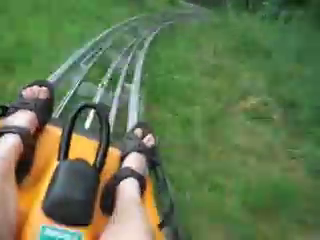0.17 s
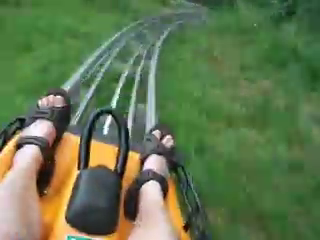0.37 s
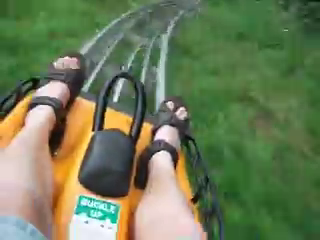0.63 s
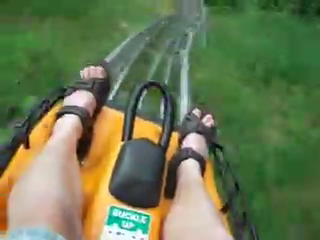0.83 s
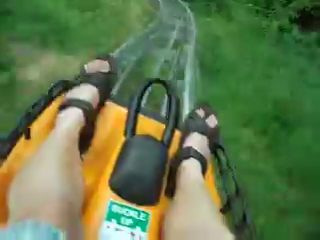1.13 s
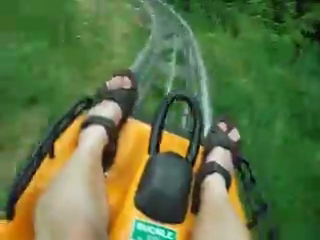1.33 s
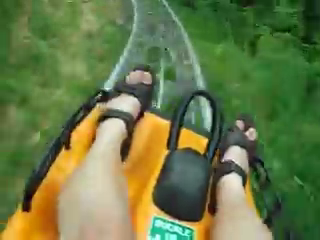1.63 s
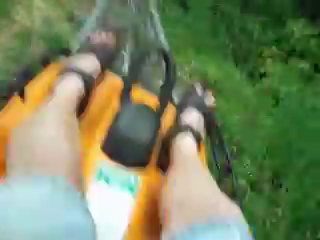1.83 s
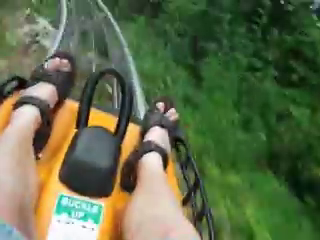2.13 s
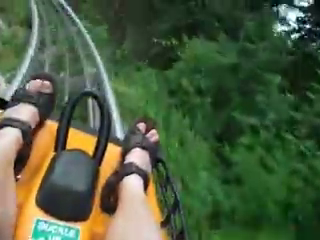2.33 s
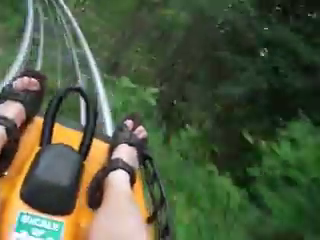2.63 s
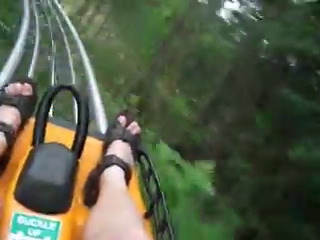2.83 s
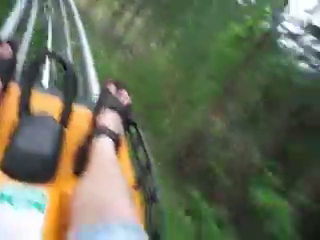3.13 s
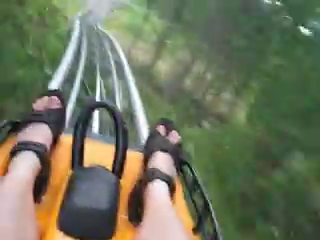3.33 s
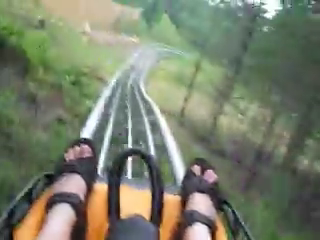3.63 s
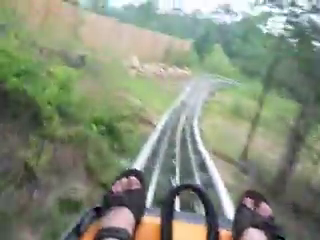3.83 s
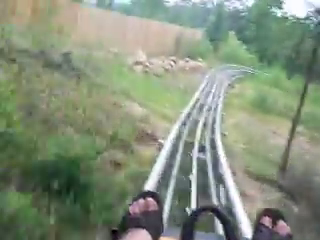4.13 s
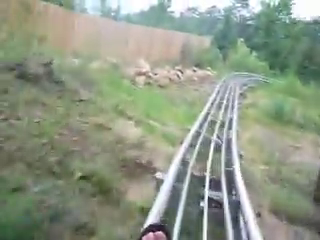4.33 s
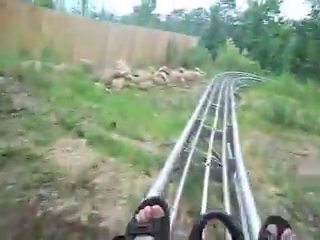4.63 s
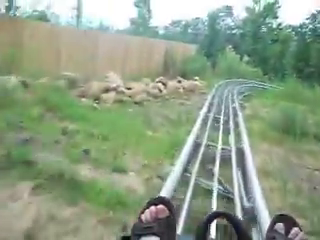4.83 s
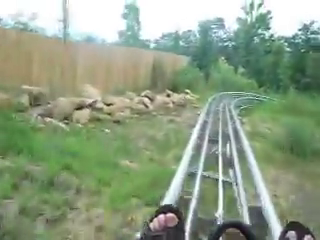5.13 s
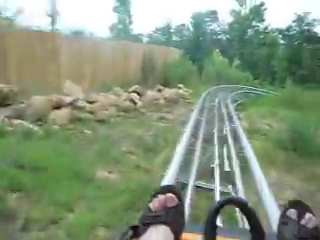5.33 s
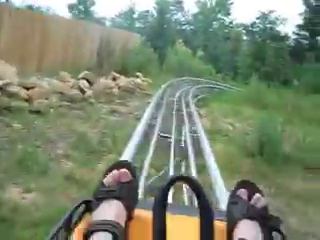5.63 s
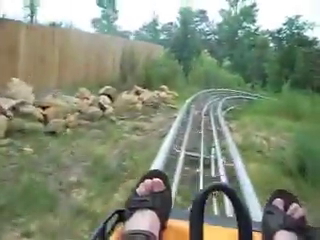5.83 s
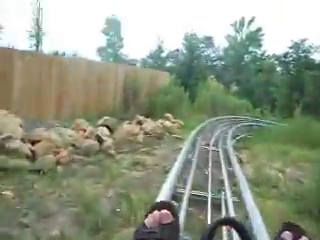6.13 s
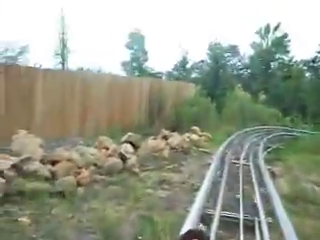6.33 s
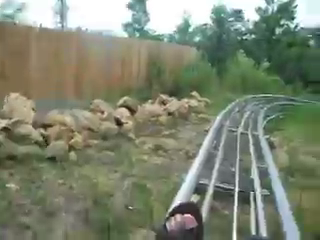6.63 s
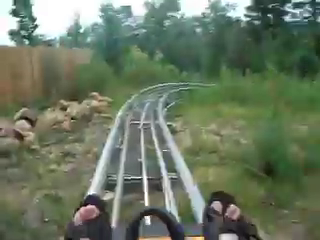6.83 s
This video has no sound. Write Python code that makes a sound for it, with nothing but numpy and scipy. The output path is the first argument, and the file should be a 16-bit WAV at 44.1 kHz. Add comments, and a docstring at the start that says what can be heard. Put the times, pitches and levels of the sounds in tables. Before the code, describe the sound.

Close rider's-seat sound of a coaster sled: hollow droning roar, wind buffeting, hard clacks and buckle ticks, then slower, heavier bumps as it eases off.

```python
"""Coaster sled on a steel track

A plastic sled runs down a tubular steel track, heard from the rider's seat through a small camera.
An out-of-round wheel slows and throbs in the hollow shell as orders of its turning rate near the shell's pitch.
Noise and tiny impacts through resonant modes make the wheels roar, hiss, rattle, clatter and grind.
The chassis thumps on bumps, a buckle ticks, flanges howl, narrow rings sound, and the brake rubs late.
Wind is low noise that grows with the shaking of the ride, with gusts on top."""
import sys
import numpy as np
from scipy import signal
from scipy.fft import rfft, irfft, next_fast_len
from scipy.io import wavfile
from scipy.ndimage import uniform_filter1d

SR = 44100
rng = np.random.default_rng(int(sys.argv[2]) if len(sys.argv) > 2 else 0)


def put_to_file(sound):
    """Save the sound as 16-bit audio at rate SR, in the file named by the first command-line argument."""
    columns = np.atleast_2d(sound).T  # one column per channel
    safe = np.clip(columns, -1, 1)
    whole_steps = np.round(safe * 32767)
    wavfile.write(sys.argv[1], SR, whole_steps.astype(np.int16))


N = 307813
TIME = np.arange(N) / SR  # s


def from_db(db):
    """Level law: decibels to amplitude gain."""
    return 10 ** (np.asarray(db) / 20)


def rms_one(x):
    """Power normalisation: scale to rms 1."""
    return x / np.sqrt(np.mean(x ** 2) + 1e-20)


def even_level(x, window, floor):
    """Automatic levelling: divide by the moving rms over a window of samples."""
    return x / np.sqrt(np.abs(uniform_filter1d(x ** 2, size=window)) + floor)


def in_time(rows):
    """Linear interpolation: each column of a curve at every sample."""
    s, *columns = np.transpose(rows)
    return [np.interp(TIME, s, c) for c in columns]


def drift(rate):
    """Low-passed noise: smooth chance of rms 1 that changes about rate times a second."""
    step = 40  # samples between the slow values
    r = np.exp(-2 * np.pi * step * rate / SR)
    noise = rng.standard_normal(N // step + 2002)
    # the first 2000 values let the filter settle
    slow = signal.lfilter([1], [1, -2 * r, r * r], noise)[2000:]
    return np.interp(np.arange(N) / step, np.arange(len(slow)), rms_one(slow))


def coloured(x, spectrum):
    """Spectral shaping: a drawn spectrum that falls 30 dB per octave outside its ends; rms 1."""
    hz, db = np.transpose(spectrum)
    octave = np.log2(np.maximum(np.fft.rfftfreq(2 * N, 1 / SR), 1))
    outside = np.abs(octave - np.clip(octave, np.log2(hz[0]), np.log2(hz[-1])))
    shape_db = np.interp(octave, np.log2(hz), db) - 30 * outside
    size = next_fast_len(N)
    gain = np.interp(np.linspace(0, N, size // 2 + 1), np.arange(N + 1), from_db(shape_db))
    return rms_one(irfft(rfft(x, size) * gain, size)[:N])


def resonate(x, hz, width_hz):
    """Damped resonance: two poles, with gain 1 on top."""
    r = np.exp(-np.pi * width_hz / SR)
    zeros = np.array([1, 0, -1]) * (1 - r * r) / 2
    poles = [1, -2 * r * np.cos(2 * np.pi * hz / SR), r * r]
    return signal.lfilter(zeros, poles, x + 1e-18)


def body(x, modes):
    """Modal superposition: parallel modes with alternating signs."""
    return sum((-1) ** k * from_db(db) * resonate(x, hz, width)
               for k, (hz, width, db) in enumerate(modes))


def shaken(force, modes, wander_db):
    """Forced vibration: a moving contact point shifts the power of a noisy force from mode to mode."""
    click = signal.unit_impulse(SR // 10)
    power = np.array([np.sum(body(click, [mode]) ** 2) for mode in modes])
    favour = np.array([from_db(wander_db * drift(17)) for mode in modes])
    rings = [(-1) ** k * favour[k] * body(force, [mode]) for k, mode in enumerate(modes)]
    return sum(rings) / np.sqrt(power @ favour ** 2)


def blows(times, db):
    """Impulsive excitation: one click for each blow."""
    clicks = np.zeros(N)
    clicks[np.clip(np.round(times * SR).astype(int), 0, N - 1)] = from_db(db)
    return clicks


def struck(times, peak_db, modes):
    """Impulse response: a body under single blows, each ringing up to its peak."""
    return body(blows(times, peak_db), modes) / np.abs(body(signal.unit_impulse(SR // 10), modes)).max()


def contacts(per_s, spread_db):
    """Random impact train: tiny impacts of uneven size and either sign; rms 1."""
    sizes = from_db(spread_db * np.minimum(rng.exponential(1, N), 4)) * rng.choice([-1, 1], N)
    return rms_one(sizes * (rng.random(N) < per_s / SR))


def swell(start, length, rise, fall):
    """Pressure envelope: linear build-up, a hold until length has passed, exponential decay (all in s)."""
    age = np.maximum(TIME - start, 0)
    return np.minimum(age / rise, 1) * np.exp(-np.minimum(np.maximum(age - length, 0) / fall, 20))


def surges(rows, rise, fall):
    """Superposition: summed swells given as (start [s], length [s], level [dB])."""
    return sum(from_db(db) * swell(s, length, rise, fall) for s, length, db in rows)


def softened(x, cut_hz):
    """Compliant contact: a low-pass takes off the sharp edge."""
    return signal.sosfilt(signal.butter(2, min(cut_hz, SR / 3), fs=SR, output="sos"), x)


def without_lows(x, cut_hz):
    """High-pass filtering: only the quick part of a motion remains."""
    return signal.sosfilt(signal.butter(2, cut_hz, "high", fs=SR, output="sos"), x)


def gliding(start, length, hz, hz_per_s, width_hz):
    """Noise-driven resonance: band noise on a carrier that may glide over the length; rms near 1."""
    noise = rng.standard_normal(N) + 1j * rng.standard_normal(N)
    band = softened(noise, cut_hz=width_hz / 2)
    pitch = hz + hz_per_s * np.clip(TIME - start, 0, length)
    tone = np.real(band * np.exp(2j * np.pi * np.cumsum(pitch) / SR))
    return even_level(tone, window=SR // 12, floor=1e-12)


# the out-of-round wheel slows all the way: (time [s], rate [turns/s])
WHEEL = [(0, 27.185), (1.65, 20.882), (3.1, 19.5), (4.25, 14.48), (6.98, 10.6)]


def wheel_turns(start_turn):
    """Rotation: the wheel's rate integrates to its angle in turns."""
    rate, = in_time(WHEEL)
    return np.cumsum(rate) / SR + start_turn, rate


# how hard the ride shakes the sled; drives boom, rumble and wind: (time [s], level [dB])
RIDE = [(0, -4.5), (.21, -5.5), (.25, -4), (.35, -1), (.48, -1.5), (.7, 1), (2.9, 0), (4.3, -1.5),
        (5.4, -3), (5.8, -12), (6.98, -14.5)]
# the wheel goes light and its throb eases: (start [s], length [s])
LIFTS = [(-.04, 0.24), (0.382, 0.21), (0.9, 0.2), (1.58, .24), (2.324, 0.092), (3.022, 0.21), (3.817, 0.44),
         (4.818, 0.44)]
LIFT_LOSS_DB = 5
# hollow of the shell
BOOM_HZ, BOOM_WIDTH_HZ = 106, 28.5
BOOM_DB = -16  # at 0 dB of ride
# wheel rates [turns/s] where the throb sets in and is full, and its full share of the boom's power
THROB_FROM_PER_S, THROB_FULL_PER_S, THROB_SHARE = 13, 15, 0.9


def boom(turns, rate):
    """Order excitation: a high spot pushes once a turn; the hollow favours orders near its own pitch."""
    throb = 0
    for order in range(3, 11):
        detune = (order * rate - BOOM_HZ) / (BOOM_WIDTH_HZ / 2)
        waver = from_db(drift(2))
        throb = throb + waver * np.cos(2 * np.pi * order * turns) / (1 + detune ** 2)
    throb = even_level(throb, window=SR // 4, floor=1e-9)
    # uneven rails shake the same hollow at random
    uneven = resonate(rng.standard_normal(N), BOOM_HZ, 2 * BOOM_WIDTH_HZ)
    uneven = rms_one(resonate(uneven, BOOM_HZ, 2 * BOOM_WIDTH_HZ))
    uneven = even_level(uneven, window=SR // 6, floor=1e-9)
    share = np.clip(np.interp(rate, [THROB_FROM_PER_S, THROB_FULL_PER_S], [0, THROB_SHARE]), 0, 1)
    lifted = sum(swell(s, length, rise=0.03, fall=0.024) for s, length in LIFTS)
    level_db = BOOM_DB + in_time(RIDE)[0] - LIFT_LOSS_DB * lifted
    return from_db(level_db) * (np.sqrt(share) * throb + np.sqrt(1 - share) * uneven)


# wheel rates [turns/s]: nothing shakes loose below the first; the second is the cruising rate
SMOOTH_PER_S, CRUISE_PER_S = 12, 18


def agitation(rate):
    """Speed-dependent excitation: shaking from 0 to 1; the sled runs smoothly once it has slowed."""
    return np.interp(rate, [SMOOTH_PER_S, CRUISE_PER_S], [0, 1])


# how hard the wheels press on the rails; drives roar, hiss, rumble and rattle: (time [s], level [dB])
PRESS = [(0, -9.5), (.225, -14), (.25, -3), (.47, -5), (.62, 1), (2.2, 2), (2.95, -0.5), (3.2, -4),
         (3.52, 3), (3.9, 0), (4.3, 4.5), (5.25, 0.5), (5.55, 0.5), (5.75, 0.5), (6.03, -1.5), (6.3, 2),
         (6.6, -3), (6.98, -6)]
# levels at 0 dB of ride and press and at the cruising rate; tread is the reference for hiss and sizzle
RUMBLE_DB, ROAR_DB, TREAD_DB = -27, -31, -38.5
# dB gained per dB of ride or press
RUMBLE_PER_RIDE, RUMBLE_PER_PRESS, ROAR_PER_PRESS, HISS_PER_PRESS = 0.96, 0.21, 0.95, 1.21
# a faster wheel shifts the noise from rumble to roar (dB per octave of wheel rate)
ROAR_DB_PER_OCTAVE, RUMBLE_DB_PER_OCTAVE = 3.5, -6


def roll_levels(rate):
    """Power-law scaling: rumble, roar and tread in dB from ride, press and the wheel's rate."""
    ride, press = in_time(RIDE)[0], in_time(PRESS)[0]
    octaves = np.log2(rate / CRUISE_PER_S)
    rumble_db = RUMBLE_DB + RUMBLE_PER_RIDE * ride + RUMBLE_PER_PRESS * press
    rumble_db = rumble_db + RUMBLE_DB_PER_OCTAVE * octaves
    roar_db = ROAR_DB + ROAR_PER_PRESS * press + ROAR_DB_PER_OCTAVE * octaves
    return rumble_db, roar_db, TREAD_DB + HISS_PER_PRESS * press


# colours of rumble and tread hiss: (frequency [Hz], relative density [dB per Hz])
RUMBLE = [(110, -6.5), (160, 0.5), (220, -0.5), (320, 0.5), (420, -11), (560, -15.5)]
HISS = [(1600, 0.5), (2100, -1), (2500, -1.5), (3200, -2.5), (3950, -1), (4350, 0.5), (4900, -2),
        (5400, -13), (6000, -33.5)]
# rough stretches of rail, where the rumble surges: (start [s], length [s], level [dB])
ROUGH = [(0, 0.029, -22), (1.17, 0.086, -23), (2.62, 0.42, -26.5), (3.66, 0.15, -28), (4.5, 0.21, -28)]
# modes of the plastic shell and the steel wheel carriers: (frequency [Hz], width [Hz], gain [dB])
SHELL = [(363.6, 74, 3), (547.3, 65.5, 4.5), (662, 76, 3), (764, 100, 3), (928, 94, -1.5), (1056, 65, -2.5),
         (1220, 134, -5.5), (1501, 134, -6.5), (1700, 83, -7.5), (1940, 930, -16)]
STEEL = [(1950, 260, -3), (2310, 140, -2), (2510, 160, 0), (2820, 260, 0), (3420, 260, -1), (3860, 240, -1),
         (4220, 200, -1), (4370, 90, 4), (4620, 280, -1), (4880, 240, 0), (5170, 300, -5)]
# swing of the wheel load at full agitation: once a turn (peak), and at random (rms)
TURN_SWING_DB, SHAKE_DB = 1.5, 2


def rolling(turns, rate):
    """Roughness excitation: rail texture under a load that pulses with each turn and shakes at random."""
    rumble_db, roar_db, tread_db = roll_levels(rate)
    load_db = agitation(rate) * (TURN_SWING_DB * np.cos(2 * np.pi * turns) + SHAKE_DB * drift(31))
    rumble_level = np.hypot(from_db(rumble_db), surges(ROUGH, rise=0.041, fall=0.021))
    rumble = rumble_level * from_db(load_db) * coloured(rng.standard_normal(N), RUMBLE)
    roar_force = from_db(roar_db + load_db) * contacts(per_s=1600, spread_db=1.0)
    roar = shaken(roar_force, SHELL, wander_db=2.5)
    # the tread follows the load at half strength
    tread = from_db(tread_db + 0.5 * load_db)
    hiss = from_db(-3.5) * tread * coloured(contacts(per_s=11000, spread_db=4.5), HISS)
    sizzle_force = from_db(-5.5) * tread * contacts(per_s=2200, spread_db=0.5)
    sizzle = shaken(sizzle_force, STEEL, wander_db=3.5)
    return rumble + roar + hiss + sizzle


# jolts per s at full agitation, decay of a jolt [s], drive of shell and steel against roar and tread [dB]
JOLTS_PER_S, JOLT_S, JOLT_SHELL_DB, JOLT_STEEL_DB = 19, 0.0082, 5, 8


def rattle(rate):
    """Random impacts: jolts set loose fittings chattering, harder as the wheels roll harder."""
    _, roar_db, tread_db = roll_levels(rate)
    jolts = (rng.random(N) < JOLTS_PER_S * agitation(rate) / SR) * rng.uniform(0.48, 1, N)
    shaking = signal.lfilter([1], [1, -np.exp(-1 / (JOLT_S * SR))], jolts + 1e-18)
    force = shaking * contacts(per_s=2500, spread_db=5.5)
    shell = shaken(from_db(roar_db + JOLT_SHELL_DB) * force, SHELL, wander_db=0.5)
    return shell + shaken(from_db(tread_db + JOLT_STEEL_DB) * force, STEEL, wander_db=4.0)


# colour of the wind: (frequency [Hz], relative density [dB per Hz])
GUSTS = [(12, -11.5), (30, -5), (50, -9.5), (75, -13.5), (100, -6.5)]
# gusts that hit the microphone: (start [s], length [s], level [dB])
BUFFETS = [(.02, 0.075, -19), (.69, 0.051, -24), (2.69, 0.11, -17), (3.64, 0.11, -19.5), (4.52, 0.24, -21),
           (6.93, 0.057, -31)]
# level at 0 dB of ride, and dB gained per dB of ride
WIND_DB, WIND_PER_RIDE = -26, 0.58


def wind():
    """Turbulent pressure: lumpy low noise at the microphone grows with the ride, and gusts come on top."""
    lumps_db = 1.5 * drift(8)
    steady = from_db(WIND_DB + WIND_PER_RIDE * in_time(RIDE)[0])
    pressure = np.hypot(steady, surges(BUFFETS, rise=0.016, fall=0.03))
    return pressure * from_db(lumps_db) * coloured(rng.standard_normal(N), GUSTS)


# the chassis bottoming on bumps: (time [s], boom level [dB], slap peak before softening [dB])
THUMPS = [(0.059, -48, -16), (.102, -30, -9.5), (.359, -24, -13.5), (1.692, -34, -10.5), (3.723, -5.5, -37),
          (4.757, -6, -44), (4.958, -25, -4.5), (5.39, -8, -52), (5.431, -5, -11.5), (5.687, -15, 0),
          (5.699, -36, -1.5), (5.935, -10, -41), (6.11, -15, -24), (6.482, -41, -12), (6.748, -29, -9),
          (6.763, -11, -6)]
# panel struck by the chassis: (frequency [Hz], width [Hz], gain [dB])
PANEL = [(161, 110, 7), (378, 48, 12), (554, 230, -2), (860, 280, -4)]
# hold of the squeeze on the hollow, time between touches of the bouncing panel, loss per touch
SQUEEZE_S, BOUNCE_S, BOUNCE_LOSS_DB = 0.021, 0.00595, 12


def thumps():
    """Impact and cavity response: a padded slap on a bouncing floor panel, and a boom of the hollow."""
    s, boom_db, slap_db = np.transpose(THUMPS)
    squeezes = [(start, SQUEEZE_S, db) for start, db in zip(s, boom_db)]
    squeeze = surges(squeezes, rise=0.014, fall=0.013)
    hollow = squeeze * np.sin(2 * np.pi * BOOM_HZ * TIME)
    touches = np.arange(3)[:, None]
    touch_times = (s + touches * BOUNCE_S).ravel()
    touch_db = (slap_db - touches * BOUNCE_LOSS_DB).ravel()
    return hollow + softened(struck(touch_times, touch_db, PANEL), cut_hz=2300)


def crack(force):
    """Direct contact sound: the broad, dry snap of each contact, with no ring."""
    return 2 * without_lows(force, cut_hz=1200)


# hard clacks of the wheels at rail joints and in bends:
# (time [s], relative shell drive [dB], relative steel drive [dB], length [s])
CLACKS = [(0.0997, -17, -55, 0.0029), (0.875, -8.5, -25, 0.012), (1.203, -3.5, -25.5, 0.04),
          (1.529, -9, -16, 0.016), (1.573, -5.5, -25.5, 0.02), (1.624, -11.5, -43, 0.0065),
          (1.691, -8, -40, 0.006), (1.81, -3, -22, 0.028), (2.168, -19.5, -24, 0.0066),
          (2.199, -6.5, -26, 0.03), (2.301, -13, -38, 0.015), (2.338, -17, -16.5, 0.014),
          (2.362, -10, -18, 0.014), (2.406, -13.5, -24, 0.0076), (2.533, -14, -24, 0.018),
          (2.721, -22, -26.5, 0.008), (2.906, -22, -16, 0.0067), (2.928, -5.5, -34, 0.044),
          (3.01, -10, -26, 0.053), (3.257, -10, -26, 0.013), (3.609, -3.5, -28, 0.0098),
          (3.8135, -11.5, -50, 0.005), (3.85, -4.5, -40, 0.011), (3.959, -2.5, -18.5, 0.015),
          (4.009, -12, -24.5, 0.028), (4.068, -1.5, -37, 0.014), (4.201, -13, -33, 0.011),
          (4.238, -11, -25.5, 0.027), (4.419, -7, -17, 0.014), (4.561, -15.5, -24, 0.01),
          (4.692, -17, -21.5, 0.034), (4.784, -9.5, -17, 0.016), (4.914, -10, -26, 0.01),
          (4.939, -11, -25, 0.0076), (4.956, -2.5, -19, 0.0042), (4.985, -7, -32, 0.02),
          (5.047, -10.5, -37, 0.0045), (5.323, -14.5, -23, 0.034), (5.628, -8.5, -39, 0.017),
          (5.689, -11, -27, 0.016), (6.109, -7.5, -38, 0.056), (6.476, -4, -33, 0.013),
          (6.7465, -4, -44, 0.014), (6.762, -8, -28, 0.017), (6.949, -12, -33, .01)]
# wheel flanges grinding: (start [s], length [s], shell drive [dB], steel drive [dB])
GRINDS = [(1.556, 0.057, -26, -31), (2.27, 0.1, -31.5, -28.5), (4.08, 0.16, -20.5, -30.5),
          (4.822, 0.054, -26.5, -27), (4.931, 0.14, -26, -30.5), (5.528, 0.14, -32.5, -51.5),
          (5.663, 0.055, -22, -32.5)]
CLACK_FADE_DB = 5  # fall of a clack's flurry over its length
CRACK_DB = -10.5  # gain of the bare crack of steel on steel, beside its ring


def clatter():
    """Repeated impact: a clack is a blow and a fading flurry, a grind a flurry; both shake shell and steel."""
    on_shell, on_steel = np.zeros(N), np.zeros(N)
    for s, shell_db, steel_db, length in CLACKS:
        fade_db = CLACK_FADE_DB * (.5 - np.clip((TIME - s) / length, 0, 1))
        press = swell(s, length, rise=.0005, fall=.006) * from_db(fade_db)
        on_shell += from_db(shell_db - 14.0) * press
        on_steel += from_db(steel_db - 1.5) * press
    for s, length, shell_db, steel_db in GRINDS:
        press = swell(s, length, rise=0.00088, fall=0.048)
        on_shell += from_db(shell_db) * press
        on_steel += from_db(steel_db) * press
    chatter = from_db(2.0 * drift(210))
    times, shell_db, steel_db, length = np.transpose(CLACKS)
    steel_flurry = on_steel * chatter * contacts(per_s=2200, spread_db=0.5)
    steel_force = steel_flurry + blows(times, steel_db + 17)
    steel = shaken(steel_force, STEEL, wander_db=6.5) + from_db(CRACK_DB) * crack(steel_force)
    steel = softened(steel, cut_hz=3950)
    shell_force = on_shell * chatter * contacts(per_s=2200, spread_db=4.5)
    flurry = shaken(shell_force, SHELL, wander_db=0.0)
    # the shorter the clack, the more of its shell force lands in the first blow, which the tyre softens
    first_blow = struck(times, shell_db + 5 - 400 * length, SHELL)
    knock = flurry + softened(first_blow, cut_hz=1050)
    return steel + without_lows(knock, cut_hz=500)


# buckle ticks: (time [s], peak [dB], brightness [dB per octave])
TICKS = [(1.0664, -0.5, 16), (1.6676, -7.5, 13), (2.5891, -13, -1), (3.599, -13, 8), (5.3996, -10, 26),
         (6.529, -9.5, -3.5), (6.5508, -14, -5), (6.652, -17.5, -8), (6.6686, -11.5, 20), (6.677, -13, -2),
         (6.6834, -12.5, 2), (6.7199, -10, -5), (6.977, -10, 6)]
# modes of the buckle: (frequency [Hz], width [Hz], gain [dB])
BUCKLE = [(1240, 480, 0.5), (2600, 230, 4.5), (3500, 290, -2), (3870, 250, -1.7)]


def buckle():
    """Modal beating: hard ticks start all modes together; a harder contact favours the higher ones."""
    out, click = np.zeros(N + SR), signal.unit_impulse(SR // 10)
    contact = softened(softened(click, cut_hz=4200), cut_hz=4200)
    lowest_hz = BUCKLE[0][0]
    for s, peak_db, tilt in TICKS:
        tick = sum(from_db(db + tilt * np.log2(hz / lowest_hz)) * resonate(contact, hz, width)
                   for hz, width, db in BUCKLE)
        start = int(round(s * SR))
        out[start:start + len(tick)] += from_db(peak_db) * tick / np.abs(tick).max()
    return out[:N]


# a grinding flange howls: (start [s], length [s], pitch [Hz], glide [Hz/s], level [dB])
HOWLS = [(1.585, 0.058, 817, -2500, -32), (4.116, 0.13, 769, 2309, -21.5),
         (4.811, 0.028, 1598, 9000, -27.5), (4.972, 0.026, 853, 2003, -23),
         (5.666, 0.035, 1417, 11996, -28.5), (6.106, .13, 885, -1600, -30), (6.265, 0.097, 572, -900, -35)]
# narrow rings: the rail singing high, a clack's ring at 2750 Hz, the brake pads' ring at 2540 Hz:
# (start [s], length [s], pitch [Hz], level [dB])
RINGS = [(1.722, 0.014, 4700, -31), (1.856, 0.013, 4800, -33), (3.957, .012, 2750, -24.5),
         (4.07, 0.22, 4750, -34), (5.052, 0.028, 4400, -35), (5.454, .22, 2540, -37)]
HOWL_Q, RING_Q = 2.3, 7  # sharpness: pitch over width


def howls_and_rings():
    """Stick-slip and resonance: a flange howls, gliding; rail, a clack and the brake pads ring narrowly."""
    out = np.zeros(N)
    for s, length, hz, db in RINGS:
        ring = gliding(s, length, hz, 0, hz / RING_Q)
        out += from_db(db) * swell(s, length, rise=0.006, fall=0.014) * ring
    # the flange sticks and slips, which makes the howl gritty
    grit = rms_one(from_db(2.5 * drift(180)))
    for s, length, hz, glide, db in HOWLS:
        cry = gliding(s, length, hz, glide, hz / HOWL_Q)
        out += from_db(db) * grit * swell(s, length, rise=0.006, fall=0.017) * cry
    return out


# brake pads scuffing: (start [s], length [s], level [dB])
RUBS = [(5.52, 0.2, -35), (6.675, .03, -26), (6.925, .14, -25.5)]
# modes of the pads: (frequency [Hz], width [Hz], gain [dB])
PADS = [(1320, 320, 0), (2270, 30, -0.5), (2594, 210, -5), (3830, 180, -10.5)]
# the floor panel groans under strain, and rings briefly after the knock at 6.47 s:
# (start [s], length [s], pitch [Hz], glide [Hz/s], level [dB])
PANEL_TONES = [(5.12, 0.3, 195, -77.5, -25.5), (6.162, 0.084, 347.4, -420, -20),
               (6.308, 0.282, 344.7, -130, -32), (6.468, 0.03, 315, 0, -22)]
PANEL_TONE_Q = 5.5  # pitch over width


def brake_and_floor():
    """Sliding friction: pads scuff in their resonances; the floor groans, sagging, and rings after a knock."""
    scuff = shaken(contacts(per_s=7800, spread_db=4.5), PADS, wander_db=0.0)
    out = surges(RUBS, rise=0.052, fall=0.019) * scuff
    for s, length, hz, glide, db in PANEL_TONES:
        tone = gliding(s, length, hz, glide, hz / PANEL_TONE_Q)
        out += from_db(db) * swell(s, length, rise=0.028, fall=0.075) * tone
    return out


def scene():
    """Linear superposition: every source rides with the microphone in the open air, so they simply add."""
    turns, rate = wheel_turns(start_turn=.31)
    wheels = boom(turns, rate) + rolling(turns, rate) + rattle(rate)
    hits = thumps() + clatter() + buckle()
    return (wheels + wind() + hits + howls_and_rings() + brake_and_floor())[None]


# the camera's bandwidth, the amplitude at which it clips, and the upper limit after clipping
CAMERA_BAND_HZ, OVERLOAD, CUTOFF_HZ = 5850, .72, 15800


def record(dry):
    """Band-limiting and overload: clipping the narrow band on the hardest hits adds a bright snap."""
    narrow = signal.sosfilt(signal.ellip(10, .2, 70, CAMERA_BAND_HZ, fs=SR, output="sos"), dry)
    clipped = np.clip(narrow, -OVERLOAD, OVERLOAD)
    return signal.sosfilt(signal.ellip(10, .2, 70, CUTOFF_HZ, fs=SR, output="sos"), clipped)


dry = scene()
out = record(dry)
put_to_file(out)
```